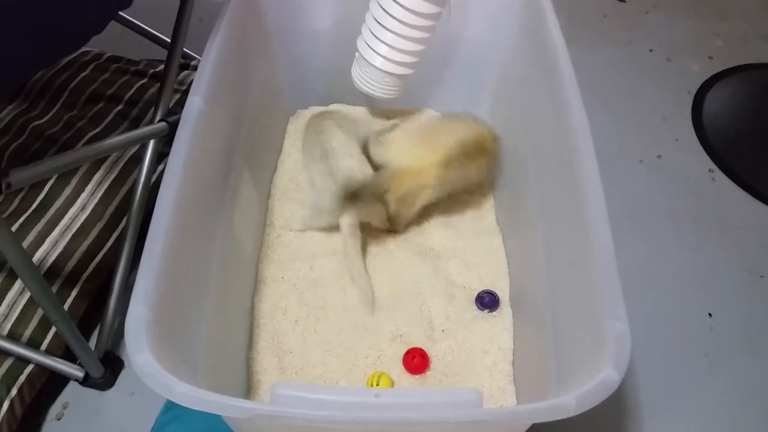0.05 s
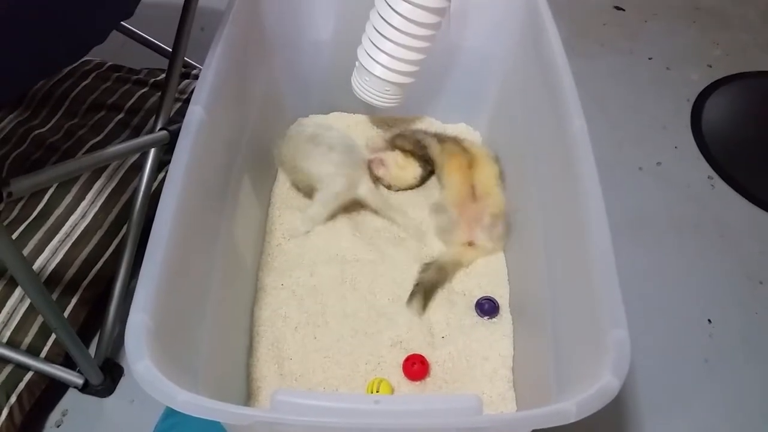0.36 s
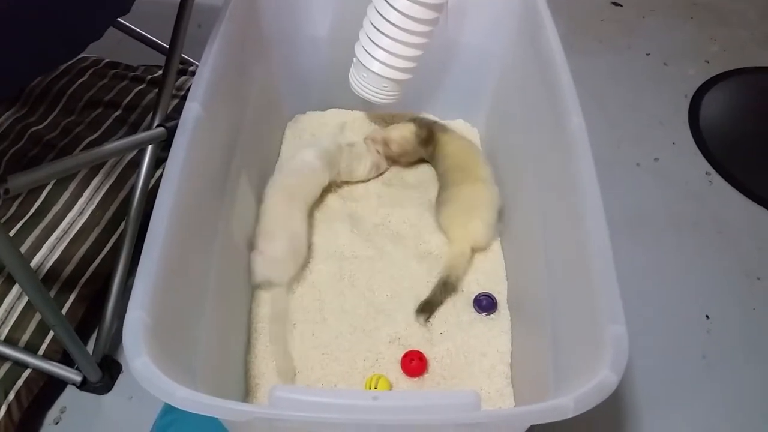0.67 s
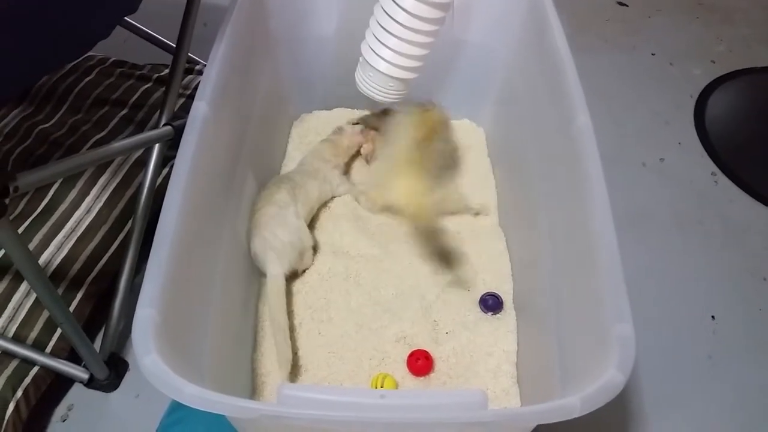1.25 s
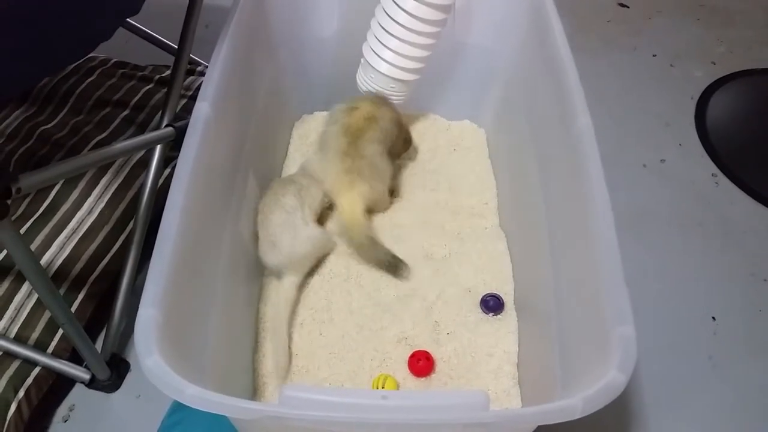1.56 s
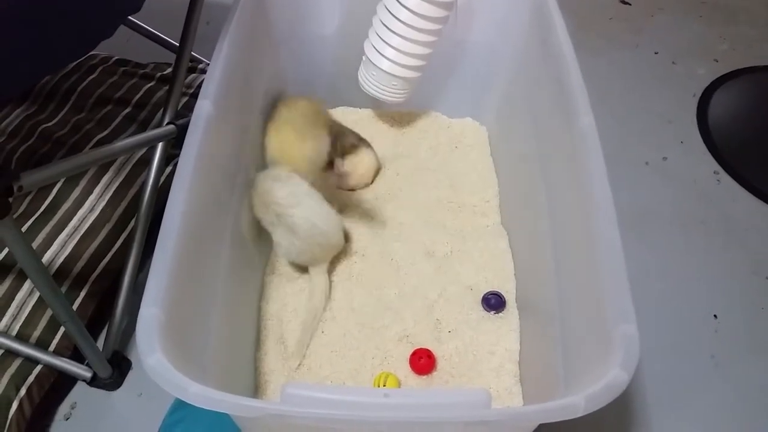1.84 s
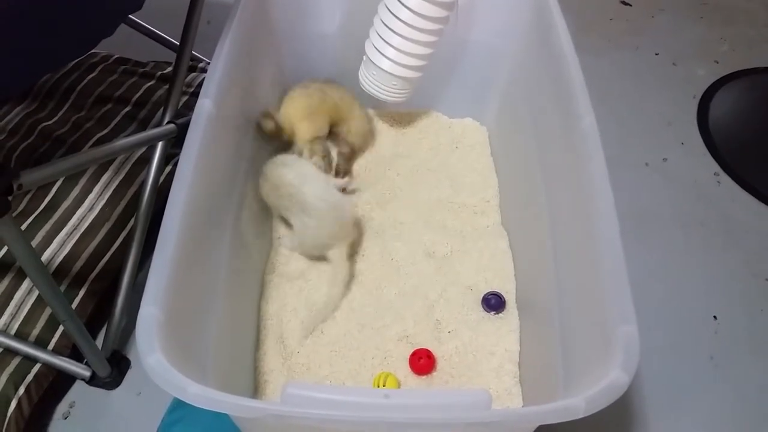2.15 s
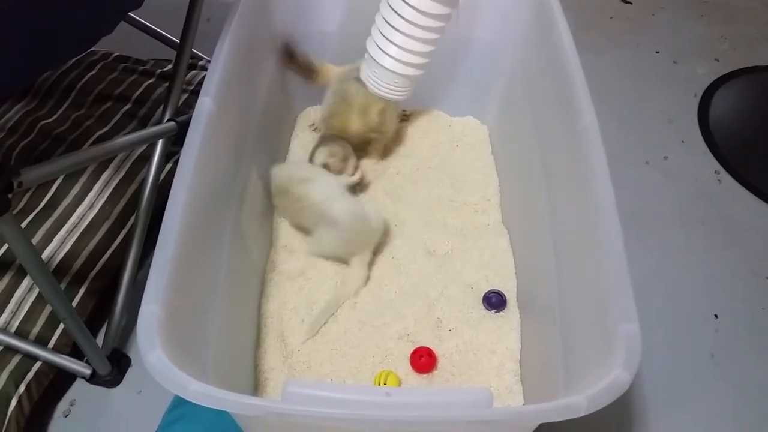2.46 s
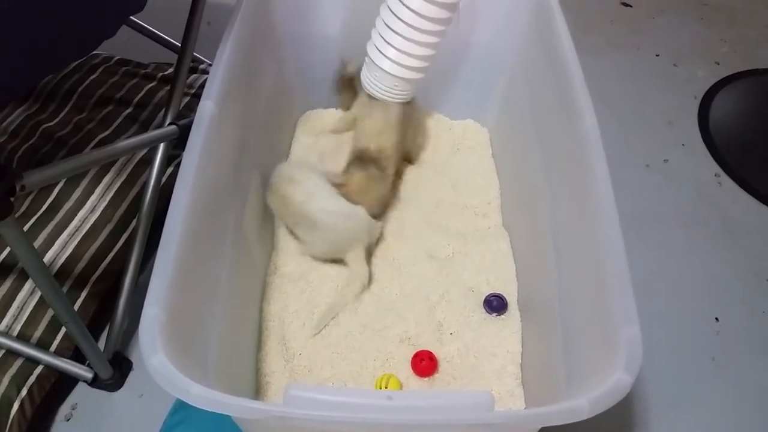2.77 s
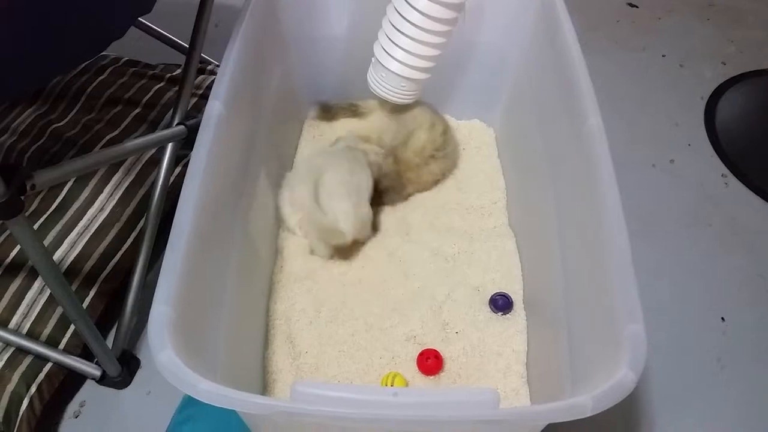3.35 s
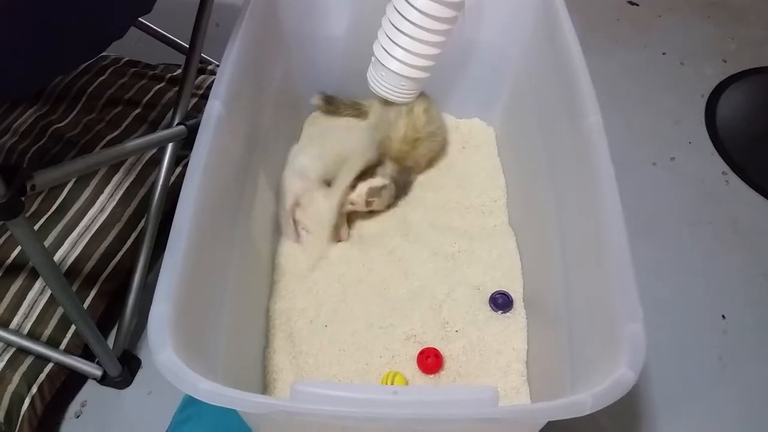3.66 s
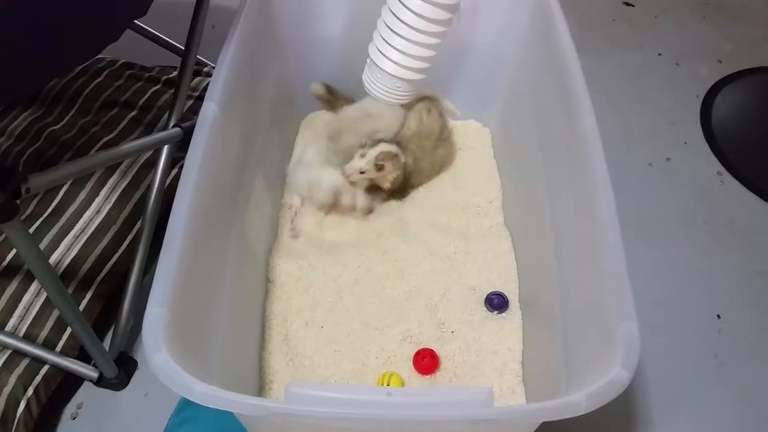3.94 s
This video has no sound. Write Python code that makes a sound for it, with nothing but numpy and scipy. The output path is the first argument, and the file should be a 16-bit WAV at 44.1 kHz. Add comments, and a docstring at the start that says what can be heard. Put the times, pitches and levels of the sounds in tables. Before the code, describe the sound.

Two ferrets wrestle and squeak, bumping a plastic tub and stirring its grainy bedding.

```python
"""Ferrets wrestling in a plastic tub

Two ferrets wrestle in loose, grainy bedding, heard from above in a quiet room. One whimpers,
then squeals in a quick run of squeaks, its vocal folds driving the resonances of its throat.
Bodies slide in the tub and thump it, exciting its modes; grains hiss and spatter on its walls.
Something small and hard clinks, and near the end claws scrape once."""
import sys
import numpy as np
from scipy import signal
from scipy.fft import rfft, irfft
from scipy.io import wavfile

SR = 44100
rng = np.random.default_rng(int(sys.argv[2]) if len(sys.argv) > 2 else 0)


def unload_wav(signal):
    """Save mono or channel-first audio to the path in sys.argv[1] as 16-bit WAV at rate SR, clipped to [-1, 1]."""
    wavfile.write(
        sys.argv[1],
        SR,
        np.round(np.clip(np.atleast_2d(signal).T, -1, 1) * 32767).astype(np.int16),
    )


N = 176400


def call(overtones_db, curve, tract, jitter, flutter_hz, rasp_db, tremor_db=0, sway=0):
    """Source and filter: the vocal tract shapes the folds' harmonics and a rasp pulsed at their pitch."""
    times, pitch, level = np.transpose(curve)
    start, end, edge_s = min(times), max(times), .004
    t = np.arange(start * SR, (end + edge_s / 2) * SR) / SR
    n = len(t)
    hz = np.interp(t, times, pitch)
    turns = np.cumsum(hz * np.exp(jitter * wander(n, flutter_hz))) / SR
    k = np.arange(1, 11)[:, None]  # harmonic numbers
    mouth = np.exp(sway * wander(n, flutter_hz))  # shifts the resonances
    gains = amp(read(tract, k * hz * mouth) + overtones_db * (k > 1))
    partials = gains * sine(k * turns + rng.random(k.shape))
    breath = colour(rng.standard_normal(n), [(min(pitch) / 2, -20)] + list(tract))
    rasp = breath * (1 + sine(turns)) * amp(overtones_db + rasp_db)
    gate = np.minimum(np.minimum(t - start, max(t) - t) / edge_s, 1)
    loudness = amp(np.interp(t, times, level) + tremor_db * wander(n, flutter_hz))
    return start, (sum(partials) + rasp) * gate * loudness


# High and low calls: (overtone gain [dB], curve of (time [s], pitch [Hz], level [dB]))
SQUEAKS = [ (-22.5, [(1.782, 767, -46), (1.82, 800, -36), (1.852, 1110, -37.5)]),
           (-1.5, [(1.949, 1068, -27.5), (1.966, 1159, -29.5), (1.998, 1134, -42.5), (2.02, 1688, -36),
           (2.05, 1650, -44)]), (7, [(2.106, 1093, -28), (2.122, 1279, -30.5), (2.142, 1186, -32)]),
           (5.5, [(2.221, 1340, -35.5), (2.233, 1402, -29.5), (2.24, 1654, -41), (2.252, 1700, -31)]),
           (4.5, [(2.323, 1362, -34), (2.338, 1673, -35.5), (2.355, 1416, -44)]), (-19, [(2.993, 1280, -44),
           (3.008, 1242, -43)]), (-2.5, [(3.236, 1141, -36), (3.275, 918, -43.5), (3.326, 873, -48.5)]),
           (-32, [(3.324, 812, -28.5), (3.345, 1188, -40), (3.36, 936, -45)])]
WHIMPERS = [ (3.5, [(.942, 299.6, -42.5), (.962, 340.5, -43), (.995, 265.7, -42), (1.04, 286, -44.5)]),
            (-0.5, [(1.035, 284, -45.5), (1.1, 275.5, -43), (1.135, 268, -41), (1.175, 327.8, -39),
            (1.215, 301, -51)]), (4.5, [(1.661, 346, -42), (1.678, 341.6, -46.5), (1.697, 346, -52)]),
            (13.5, [(1.82, 401.3, -43.5), (1.87, 370, -54)])]
# Spectral colour of a squeak and of a whimper: (frequency [Hz], gain [dB])
THROAT = [(1400, 0.5), (2100, -12), (2700, 3.5), (3500, -5), (4800, -23.5), (7100, -7), (14000, -30.5)]
MUZZLE = [(300, 2.5), (850, -8), (1150, -18), (1600, -18.5), (3000, -31.5)]

def voice():
    """Phonation: fast, jittering vocal folds squeak; slower, trembling ones whimper."""
    out = np.zeros(N)
    for row in SQUEAKS:
        add(out, *call(*row, THROAT, jitter=.023, flutter_hz=500, rasp_db=-12))
    for row in WHIMPERS:
        add(out, *call(*row, MUZZLE, jitter=.035, flutter_hz=80, rasp_db=-15, tremor_db=3.3, sway=.12))
    return out


# Bodies hitting the tub: (time [s], boom level [dB], boom pitch [Hz], knock level [dB])
THUMPS = [(0.168, -24.5, 84, -50), (0.222, -16.5, 97.6, -38), (0.377, -26.5, 118, -43.5),
          (0.712, -17, 165.4, -34.5), (.821, -18, 147, -52), (1.771, -35.5, 68.6, -36.5),
          (2.137, -21, 134.6, -39), (2.446, -19.5, 97.4, -23), (2.549, -18, 148, -32.5),
          (2.697, -15.5, 155, -26.5), (3.042, -20, 155.6, -36), (3.107, -29.5, 192, -40.5),
          (3.31, -40.5, 193, -40), (3.573, -20.5, 142, -29), (3.777, -28, 158, -44),
          (3.891, -22.5, 161, -31)]
# Modes of the tub: (frequency [Hz], level [dB])
TUB_MODES = [(63, -16.5), (102, -14.5), (190, -10.5), (275, -17)]
# Spectra of the plastic's crack and the tub's hollow tone: (frequency [Hz], level [dB])
CRACK = [(1100, 1.5), (2800, -2.5), (4500, -18), (12000, -41)]
HOLLOW = [(120, -6), (350, -1), (600, -9), (5000, -45.5)]

def thumps():
    """Impact excitation: a struck panel booms and wakes the tub's damped modes; hard knocks crack."""
    out, t = np.zeros((2, N)), tail_time()
    for start, boom_db, hz, knock_db in THUMPS:
        panel = sine(hz * t) * dying(t, .082)
        modes = sum(amp(db) * sine(f * t * rng.uniform(.94, 1.03) + rng.random()) for f, db in TUB_MODES)
        boom = amp(boom_db) * (panel + modes * dying(t, .18))
        hardness = amp(min(knock_db + 30, 0))  # cracks fully from -30 dB up
        crack = colour(narrow_bass(noise(len(t))), CRACK) * dying(t, .022) * hardness
        hollow = colour(narrow_bass(noise(len(t))), HOLLOW) * dying(t, .1) * amp(-1)
        rise = np.tanh(t / .0027)
        add(out, start, boom * rise + amp(knock_db) * (hollow * rise + crack))
    return out


def grains(n, per_s=4000, spread_db=3.7, share=.45):
    """Shot noise: dense random ticks of uneven size, partly shared by both sides."""
    shape = (3, n)
    ticks = (rng.random(shape) < per_s / SR) * np.sign(rng.standard_normal(shape))
    sizes = amp(spread_db * np.minimum(rng.exponential(size=shape), 5))
    shared, *own = ticks * sizes
    return np.sqrt(share) * shared + np.sqrt(1 - share) * np.array(own)


# Envelope of the stirred bedding, and grains flung at the wall: (time [s], level [dB])
STIRRING = [(0, -67.5), (.2, -75.5), (.25, -53), (.33, -60.5), (.44, -56), (.6, -56), (.72, -46),
            (1.3, -54.5), (1.8, -53), (2.5, -47.5), (3.0, -51.5), (3.2, -63.5), (3.37, -48), (3.405, -39),
            (3.45, -52.5), (3.56, -52.5), (3.7, -46), (3.81, -35), (3.93, -47)]
SPATTERS = [(.832, -41), (.882, -50.5), (1.116, -50.5), (1.411, -41.5), (1.707, -45.5), (1.733, -49.5),
            (2.452, -36.5), (2.567, -52), (2.715, -45), (3.028, -51), (3.321, -48), (3.386, -44.5),
            (3.458, -52), (3.601, -41.5), (3.646, -42.5), (3.679, -38)]
# Swishes of sliding bodies, and last a scrape of claws: (peak time [s], half width [s], level [dB])
SLIDES = [(0.259, 0.021, -54), (0.704, 0.047, -45.5), (1.861, 0.052, -46.5), (2.471, 0.022, -37),
          (3.737, 0.082, -34.5)]
# Spectra of grains and of sliding friction: (frequency [Hz], level [dB])
BEDDING = [(300, 1.5), (2000, 3.5), (4900, -11.5), (7100, 5.5), (9800, -1), (14300, 2)]
FRICTION = [(500, -15), (2400, 3.5), (5000, -4.5), (12000, 0.5)]

def bedding_and_slides():
    """Collision and friction: grains shift in clumps and hit the wall; bodies slide, then claws scrape."""
    t, age = np.arange(N) / SR, tail_time()
    clumps = amp(2.6 * wander(N, hz=40))
    out = colour(grains(N), BEDDING) * clumps * amp(np.interp(t, *np.transpose(STIRRING)))
    for start, db in SPATTERS:
        slap = amp(18) * dying(age, .011) * colour(noise(len(age)), BEDDING)
        scatter = .5 * dying(age, .13) * colour(grains(len(age)), BEDDING)
        add(out, start, amp(db) * (slap + scatter))
    swells = sum(amp(db) * np.exp(-np.square((t - peak) / width)) for peak, width, db in SLIDES)
    return out + colour(grains(N), FRICTION) * clumps * swells


# Bounces of a small hard object: (time [s], level [dB])
CLINKS = [(2.864, -18.5), (2.878, -25.5), (2.902, -21)]
# Its modes: (frequency [Hz], level [dB])
CLINK_MODES = [(7400, 6.5), (10700, 8), (12500, 17.5), (13600, 14)]

def clinks():
    """Free vibration: each bounce gives a scratchy tick and a high, quickly damped ring."""
    out, t = np.zeros((2, N)), tail_time()
    for start, level in CLINKS:
        ring = unit(sum(amp(db) * sine(hz * t + rng.random()) for hz, db in CLINK_MODES))
        tick = amp(6) * colour(noise(len(t)), [(5000, -23)] + list(CLINK_MODES))
        add(out, start, amp(level) * unit(ring + tick) * dying(t, t60=.035))
    return out


def echoes(x, db, t60, delay_s):
    """Reverberation: convolution with sparse reflections of random sign that decay exponentially."""
    t = tail_time()
    signs = np.sign(noise(len(t)))
    taps = (rng.random(signs.shape) < 3000 / SR) * signs * dying(t, t60) * (t > delay_s)
    taps = narrow_bass(unit(taps) / np.sqrt(len(t)))
    return amp(db) * np.array([signal.fftconvolve(side, tap)[:N] for side, tap in zip(x, taps)])


# Spectrum of the quiet room: (frequency [Hz], level [dB])
HUSH = [(25, -24), (65, -2.5), (300, -5.5), (14000, -66.5)]

def hush():
    """Ambient noise: faint, steady and strongest in the bass."""
    return amp(-53.5) * colour(narrow_bass(noise(N)), HUSH)


def narrow_bass(pair, corner_hz=1100):
    """Spatial coherence: both microphones hear nearly the same bass but different treble."""
    n = len(pair.T)
    same = .9 / (1 + (freqs(n) / corner_hz) ** 2)
    left, right = rfft(pair)
    return irfft(np.array([left, same * left + np.sqrt(1 - same ** 2) * right]), n)


def colour(x, points):
    """Filters a signal by a spectrum, at rms 1."""
    n = len(x.T)
    return unit(irfft(rfft(x) * amp(read(points, freqs(n))), n))


def wander(n, hz):
    """Random drift: noise low-passed at hz, at rms near 1."""
    return unit(irfft(rfft(rng.standard_normal(N)) / (1 + (freqs(N) / hz) ** 4), N))[:n]


def read(points, hz):
    """Interpolates a spectrum on a log-frequency axis."""
    f, value = np.transpose(points)
    return np.interp(np.log1p(hz), np.log1p(f), value)


def dying(t, t60):
    """Exponential decay of 60 dB in t60 seconds."""
    return np.exp(-np.log(1000) * t / t60)


def add(mix, start, sound):
    """Superposes a sound from start seconds on."""
    part = mix[..., round(start * SR):][..., :len(sound.T)]
    part += sound[..., :len(part.T)]


def amp(db):
    """Decibels to gain."""
    return 10 ** (np.asarray(db) / 20)


def unit(x):
    """Scales to rms 1."""
    return x / np.sqrt(np.mean(x ** 2) + 1e-20)


def freqs(n):
    """Frequencies of the spectrum of n samples."""
    return np.fft.rfftfreq(n, 1 / SR)


def sine(turns):
    """Sine of a phase in turns."""
    return np.sin(2 * np.pi * turns)


def noise(n):
    """White noise, uncorrelated left and right."""
    return rng.standard_normal((2, n))


def tail_time():
    """Time since a blow, up to half a second."""
    return np.arange(SR // 2) / SR


def scene():
    """Superposition: direct sound, reflections from tub and room, and the calls ringing on in the tub."""
    ferret, bodies = voice(), thumps()
    calls = np.array([ferret, np.roll(ferret, 2)])  # two samples later on the right
    near = calls + bedding_and_slides() + clinks()
    background = hush()
    walls = echoes(near, db=-4, t60=.07, delay_s=.001)
    room = echoes(near, db=-10, t60=.36, delay_s=.01)
    call_ring = echoes(calls, db=-10, t60=.22, delay_s=.001)
    thump_tails = echoes(bodies, db=-4.5, t60=.37, delay_s=.01)
    return near + bodies + walls + room + call_ring + thump_tails + background


# Balance of the two sides: (frequency [Hz], left minus right [dB])
TILT = [(1200, -.4), (3500, 3), (8000, -2.5)]

def record(dry):
    """Frequency response: left and right differ in colour; the highest treble is cut off."""
    tilt = read(TILT, freqs(N)) / 2
    heard = irfft(rfft(dry) * amp([tilt, -tilt]), N)
    lowpass = signal.firwin(255, 14850, window=("kaiser", 9), fs=SR)
    return signal.oaconvolve(heard, lowpass[None], "same")


dry = scene()
out = record(dry)
unload_wav(out)
```